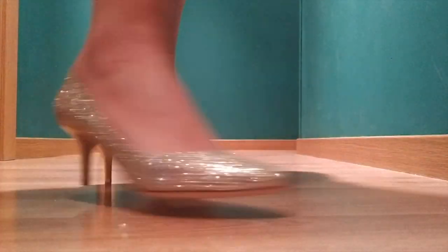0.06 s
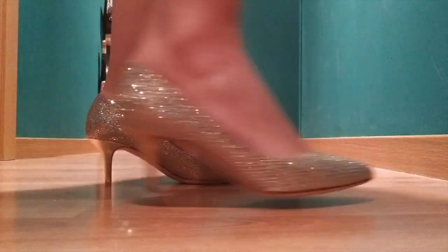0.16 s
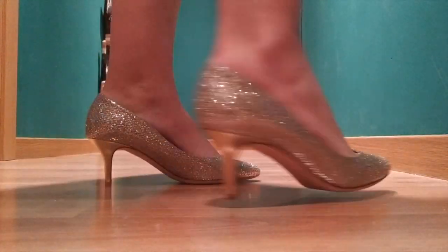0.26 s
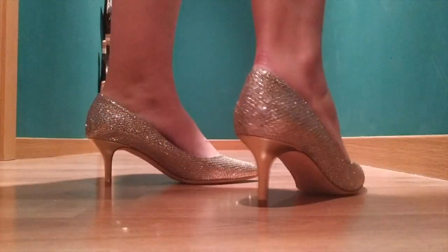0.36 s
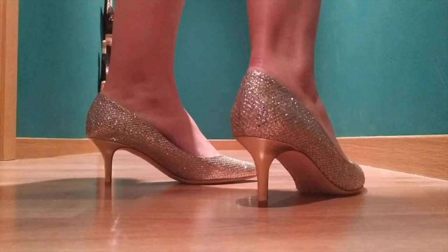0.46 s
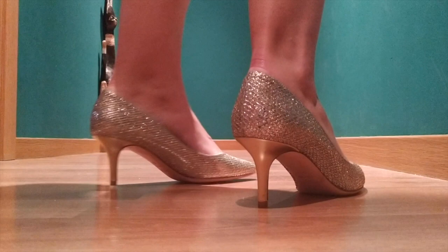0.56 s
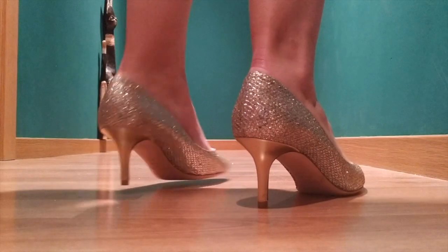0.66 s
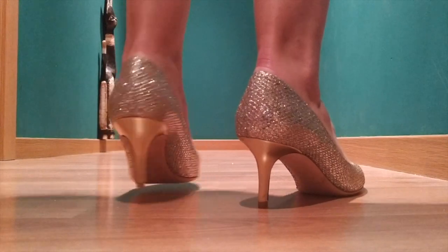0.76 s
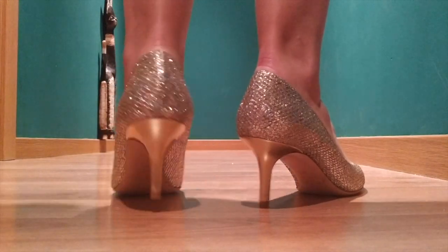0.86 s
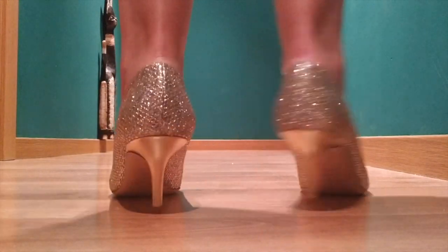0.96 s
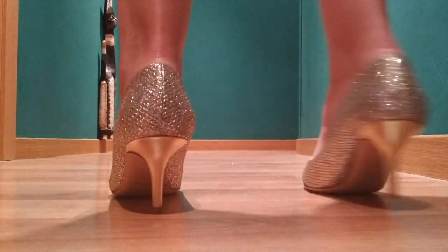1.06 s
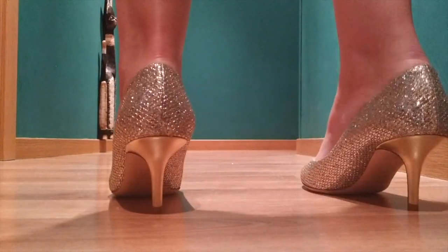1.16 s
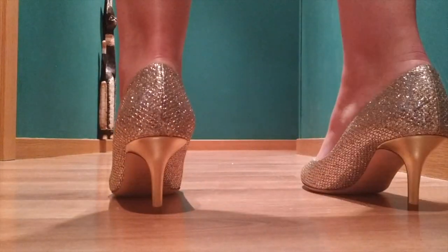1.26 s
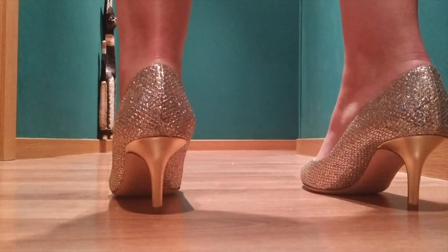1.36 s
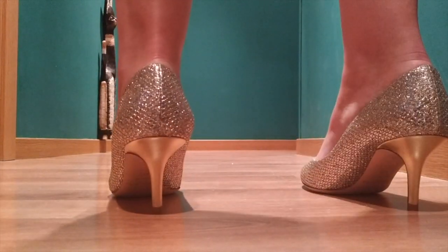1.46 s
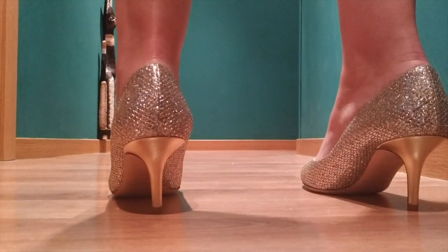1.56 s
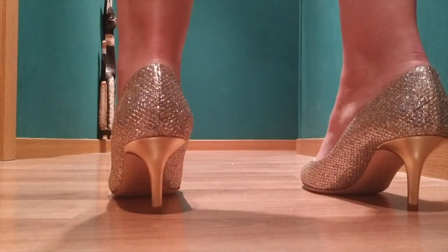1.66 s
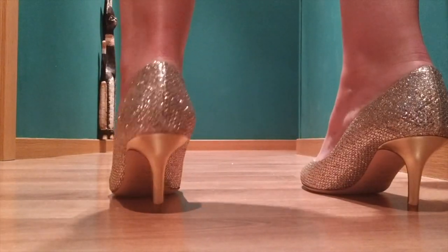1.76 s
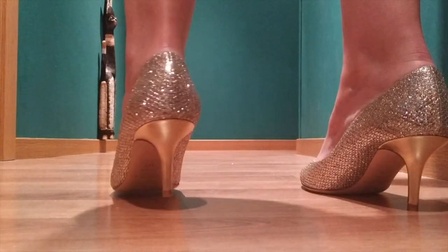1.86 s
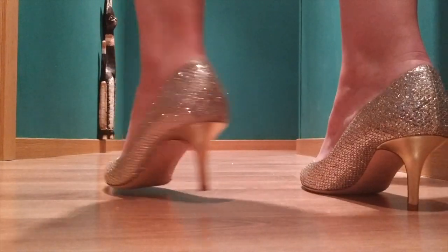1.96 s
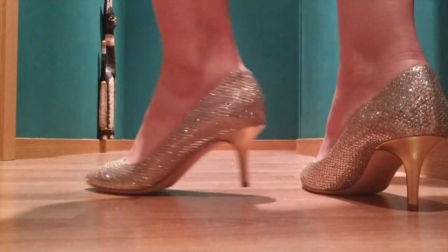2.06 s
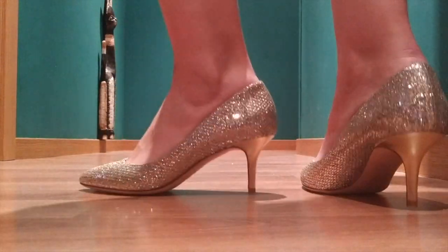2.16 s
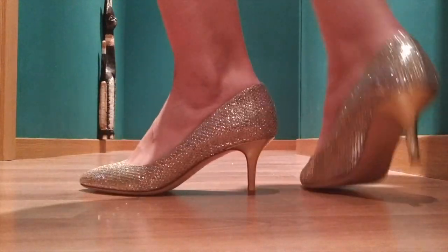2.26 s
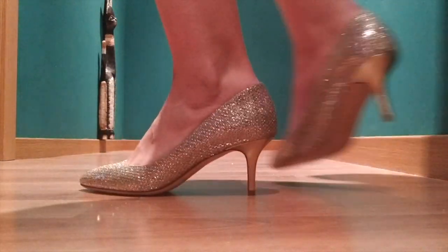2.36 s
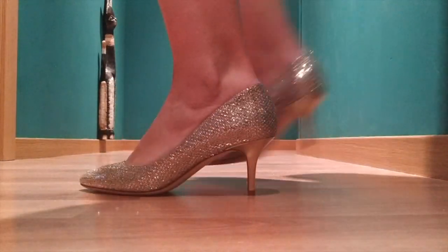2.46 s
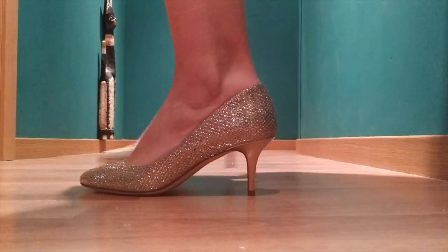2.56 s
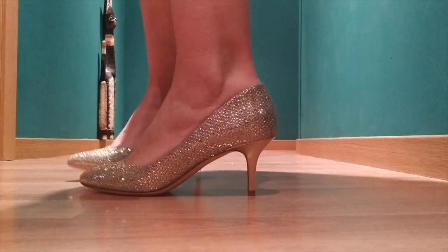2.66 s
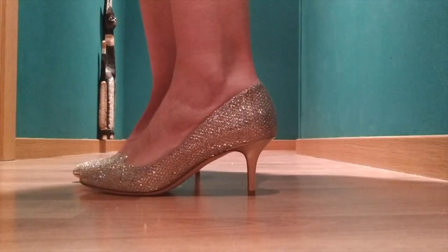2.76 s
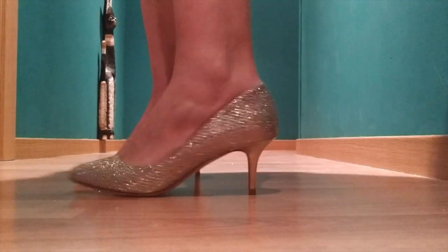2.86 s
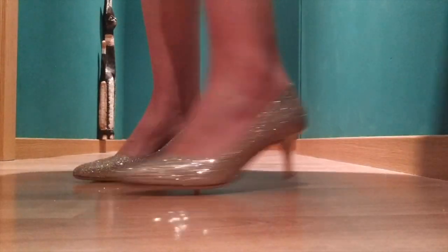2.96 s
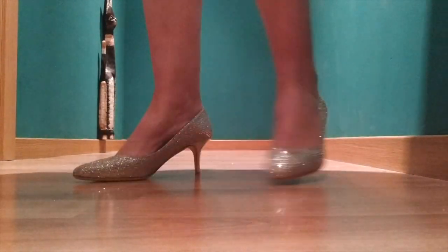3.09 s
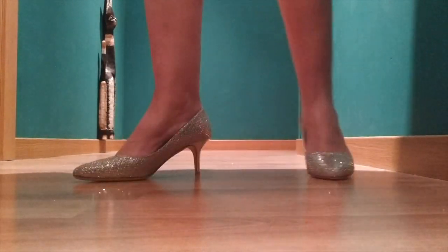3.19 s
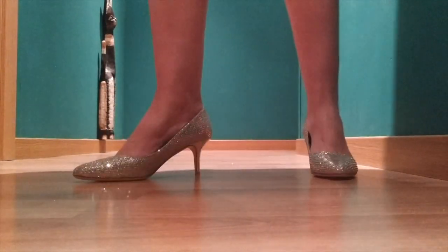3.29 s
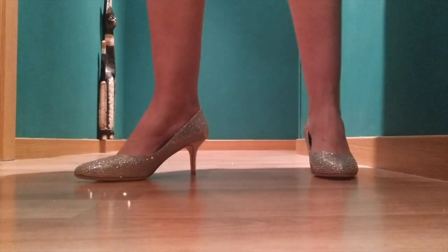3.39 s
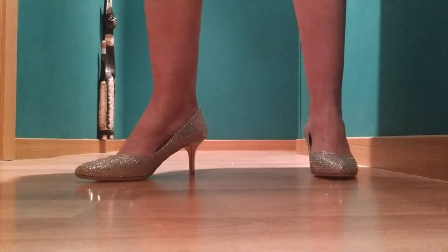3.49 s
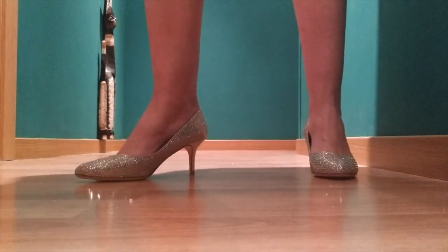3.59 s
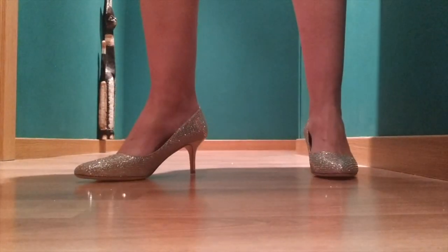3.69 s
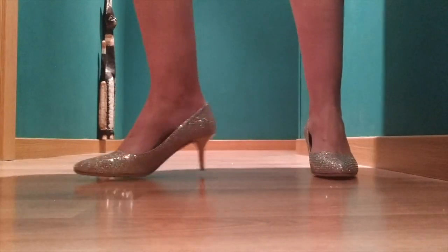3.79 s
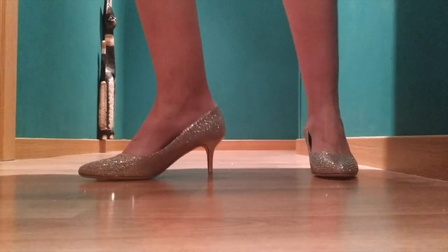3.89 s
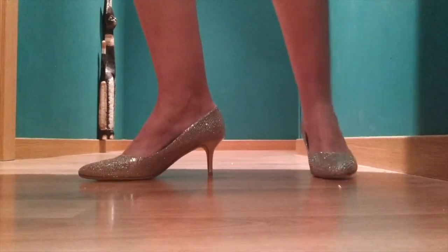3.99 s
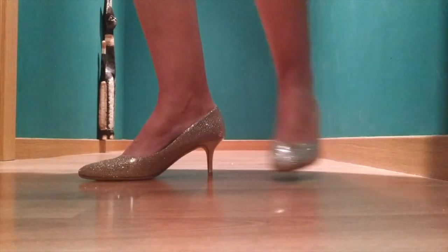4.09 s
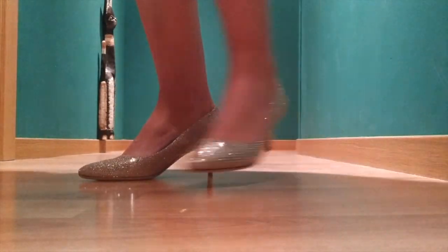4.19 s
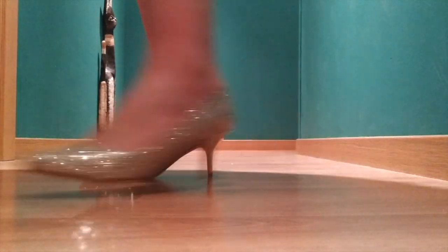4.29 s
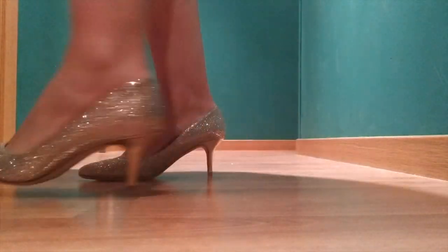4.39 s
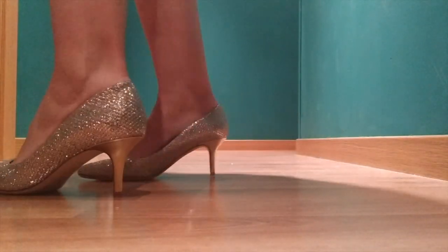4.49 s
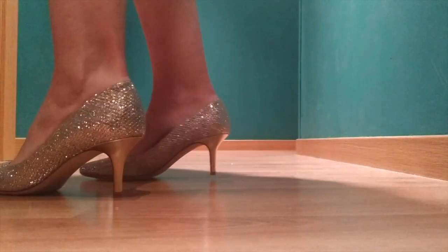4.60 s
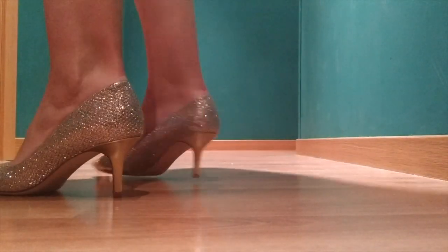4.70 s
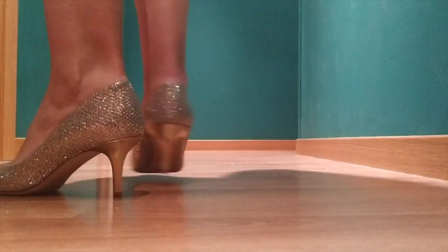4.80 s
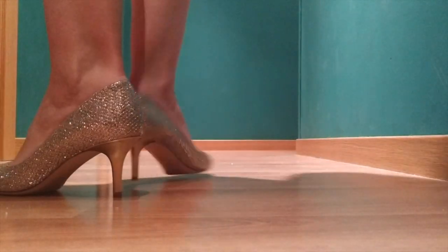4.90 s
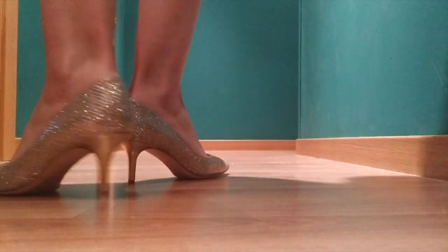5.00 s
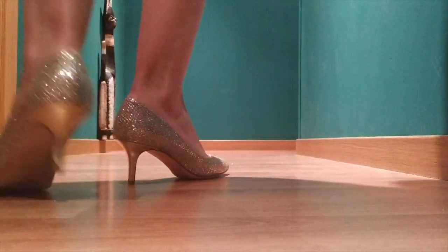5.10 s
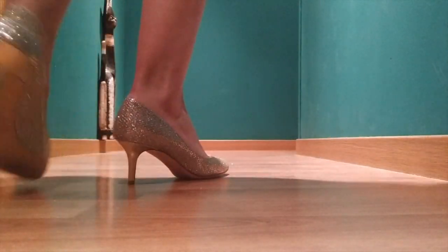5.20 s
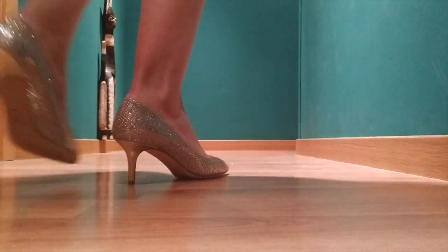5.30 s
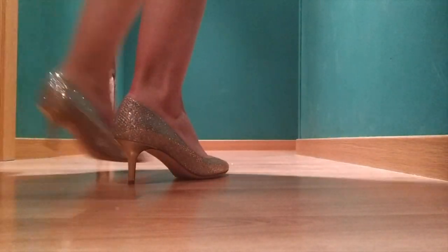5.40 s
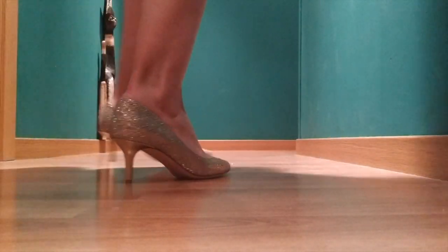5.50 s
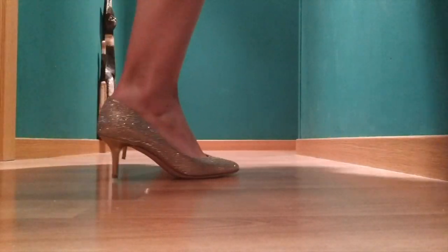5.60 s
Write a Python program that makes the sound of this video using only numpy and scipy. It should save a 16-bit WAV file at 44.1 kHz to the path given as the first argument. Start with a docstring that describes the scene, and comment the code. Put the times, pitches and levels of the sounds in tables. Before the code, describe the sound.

A small, bare, slightly boomy room with a laminate floor, heard from close stereo microphones low down. Faint hiss and a weak, swelling deep rumble lie underneath. A soft sole slide leads to a double heel knock at 0.36 s with a sharp snap. Knocks follow at 0.86 and 0.95 with a bright gritty scuff, then the loudest hollow thud at 1.16. It calms until a light step at 2.08 and a fainter one at 2.19. A quick uneven cluster of taps runs from 2.6 to 2.9, then softer knocks at 3.15 and 3.3 with scuffing and small snaps. Clickier taps come at 3.84 and 3.91. After a lull, a low, heavy double knock lands at 4.47, a crisp snap at 4.61, a lighter step at 4.94 with a hissing slide, and a last dull, ticking knock at 5.58, with a small snap after. Each knock rings for under half a second.

```python
"""In a small bare room, someone in stiletto heels steps to and fro on a laminate floor near the microphones.
Each knock is a damped thud of the board, a noise burst from the hard heel tip, two wall reflections
and a ring of reverberant noise and decaying floor modes. Between steps the sliding soles hiss as grainy,
filtered noise, and the shoes snap in short bursts of slips. A faint hiss and a deep rumble lie beneath."""
import sys
import numpy as np
from scipy import signal
from scipy.fft import rfft, irfft, next_fast_len
from scipy.io import wavfile
from scipy.ndimage import uniform_filter1d

SR = 44100
rng = np.random.default_rng(int(sys.argv[2]) if len(sys.argv) > 2 else 0)


def transcribe(u):
    """Save the signal u as a 16-bit wav file named by the first command-line argument.

    u: samples, shape (n,) or (channels, n), limited to [-1, 1]; the rate is SR.
    q: integer samples, one column per channel.
    """
    v = np.clip(np.atleast_2d(u).T, -1, 1)
    q = np.round(v * 32767).astype(np.int16)
    wavfile.write(sys.argv[1], SR, q)


N = 249165
TIME = np.arange(N) / SR
FIRST_ECHO_S = .011  # delay of the reflection from the nearest wall


def from_db(db):
    """Level to amplitude: 20 dB is a factor of ten."""
    return 10 ** (np.asarray(db) / 20)


def unit_rms(x, size=None):
    """Normalisation of power: rms 1 over the first `size` samples."""
    return x / np.sqrt(np.mean(x[..., :size] ** 2) + 1e-20)


def at_hz(points, hz):
    """Logarithmic pitch scale: interpolate a table over log frequency."""
    table = np.array(points)
    return np.interp(np.log(np.maximum(hz, 1)), np.log(table[:, 0]), table[:, 1])


def colour(x, spectrum):
    """Minimum-phase filtering: the folded cepstrum gives a causal response of the given magnitude."""
    size = 2 * next_fast_len(x.shape[-1] // 2 + 1024)
    level_db = at_hz(spectrum, np.arange(size // 2 + 1) * SR / size)
    cepstrum = irfft(np.log(from_db(level_db)))
    # fold the negative times onto the positive ones
    cepstrum[1:size // 2] *= 2
    cepstrum[size // 2 + 1:] = 0
    response = np.exp(rfft(cepstrum))
    return irfft(rfft(x, size) * response)[..., :x.shape[-1]]


# correlation of left and right in a diffuse field: f/Hz, correlation [1]
CORRELATION = [(60, 0.69), (250, 0.86), (500, 0.79), (900, 0.14), (1500, 0.019), (15000, 0.027)]


def diffuse(size):
    """Diffuse-field coherence: noise from all sides, alike in the bass and nearly unrelated in the treble."""
    mid, side = rfft(rng.standard_normal((2, size)))
    alike = np.clip(at_hz(CORRELATION, np.arange(len(mid)) * SR / size), -1, 1)
    return irfft(np.sqrt(1 + alike) * mid + np.sqrt(1 - alike) * side * [[1], [-1]], size)


def from_the_right(x, pan_db):
    """Time and level difference: direct sound reaches the left later, and pan_db stronger than the right."""
    left_lag_s = 0.000403
    t = TIME[:len(x)]
    left = np.interp(t - left_lag_s, t, x, left=0)
    return np.array([left, x]) * from_db([[pan_db / 2], [-pan_db / 2]])


def add(out, s, sound):
    """Superposition: sound pressures add from time s on."""
    part = out[:, round(s * SR):][:, :sound.shape[1]]
    part += sound[:, :part.shape[1]]


# reverberation time of the room: f/Hz, T60/s
ROOM_DECAY = [(80, 0.16), (210, 0.6), (560, .42), (1470, 0.4), (3880, 0.37), (8400, 0.46), (14000, 0.43)]


def room_tail(first_echo_s, early_db, early_s, size=26000):
    """Reverberation: dense reflections with resonant lows, each octave decaying at its own rate."""
    t = TIME[:size]
    noise = rfft(diffuse(size))
    octave = np.log2(np.clip(np.arange(noise.shape[1]) * SR / size, 62.5, 16000))
    # resonances make the spectrum lumpy, less so in the treble
    lumps_db = np.interp(octave, np.linspace(octave[0], octave[-1], 130), rng.normal(0, 3, 130))
    lumps_db = lumps_db * np.interp(octave, np.log2([1000, 2500]), [1, .15])
    noise = noise * from_db(lumps_db)
    tail = 0
    for centre in np.arange(octave[0], octave[-1] + .5):
        band = irfft(noise * np.maximum(1 - abs(octave - centre), 0), size)
        tail = tail + band * from_db(-60 * t / at_hz(ROOM_DECAY, 2 ** centre))
    arrival = np.minimum(t / first_echo_s, 1) ** 4
    return tail * arrival * from_db(early_db * np.exp(-t / early_s))


def ring(hz, t60, size, phase=0):
    """Free vibration of a damped mode: a sine that loses 60 dB in t60."""
    t = TIME[:size]
    return np.sin(2 * np.pi * hz * t + phase) * from_db(-60 * t / t60)


def burst(envelope, spectrum, pan_db, scatter_db=2.0):
    """Impulsive noise: tiny uneven slips, partly reaching each microphone scattered by shoe and floor."""
    size = len(envelope)
    slips = rng.laplace(size=(3, size))
    # flatten the spectrum, so that only the given one colours the burst
    for _ in range(3):
        slips = irfft(np.exp(1j * np.angle(rfft(slips * envelope))), size)
    slips = colour(slips * np.sqrt(envelope), spectrum)
    direct = from_the_right(slips[0], pan_db)
    scattered = from_db(scatter_db) * slips[1:]
    return unit_rms(direct + scattered, size=310)


# deep rumble: t/s, level/dB before the trim rumble_db
RUMBLE_LEVEL = [(0.0, -63.5), (0.68, -67), (0.88, -55), (2.72, -72), (4.06, -67.5), (4.88, -74),
                (5.05, -58.5), (5.32, -73.5), (5.65, -66)]
# spectrum of the still room's hiss: f/Hz, relative level/dB
QUIET_SPECTRUM = [(15, -5.5), (50, -8), (100, -20), (200, -20), (500, -29.5), (1300, -33.5), (3000, -33.5),
                  (6500, -36.5), (8400, -33), (10500, -35), (15000, -45.5)]


def quiet_room(quiet_db=-59, rumble_db=7.5):
    """Stationary and modulated noise: a faint steady hiss, and a deep rumble that comes and goes."""
    swell = from_db(np.interp(TIME, *np.transpose(RUMBLE_LEVEL)) + rumble_db)
    rumble_spectrum = [(10, -15.5), (18, 2.5), (32, -12), (55, -21.5), (150, -27.5), (600, -96)]
    rumble = unit_rms(colour(diffuse(N), rumble_spectrum))
    hiss = unit_rms(colour(diffuse(N), QUIET_SPECTRUM))
    return swell * rumble + from_db(quiet_db) * hiss


def stroke(start_s, attack_s, hold_s, fade_db_per_s=123.5):
    """Envelope of sliding friction: the sole gathers speed, glides, stops, and the sound decays exponentially."""
    t = TIME - start_s
    fade_s = np.maximum(t - attack_s - hold_s, 0)
    return np.clip(t / attack_s, 0, 1) * from_db(-fade_db_per_s * fade_s)


# slides of a sole: start t/s, time to full speed t/s, time at full speed t/s,
#                   hiss level/dB, coarse grit relative to the hiss level/dB before the trim grit_db
SLIDES_OF_SOLES = [(.03, 0.028, 0.14, -60, 4), (0.499, 0.019, 0.045, -48.5, -0.5),
                   (0.649, 0.015, 0.04, -56, -5), (0.851, .016, 0.11, -41, 2), (1.05, 0.01, .025, -51, 4),
                   (1.69, 0.047, 0.14, -58, -8), (2.073, 0.0056, .01, -47.5, -14),
                   (2.221, 0.02, 0.012, -45.5, -5), (2.76, 0.086, 0.013, -47.5, -2),
                   (3.145, 0.0072, 0.013, -42, 3.5), (3.345, 0.015, 0.012, -48.5, 2),
                   (3.67, 0.046, 0.0089, -55, -2.5), (3.83, 0.011, 0.15, -55.5, 0.5),
                   (4.45, 0.016, 0.19, -49.5, -2), (4.935, 0.02, 0.091, -43.5, -3),
                   (5.465, 0.043, 0.17, -48, -3.5)]
# spectrum of the fine friction hiss: f/Hz, relative level/dB
HISS_SPECTRUM = [(3000, -13.5), (5500, -10.5), (7200, -5.5), (8400, 5.5), (9500, -3), (11000, -11.5),
                 (13500, -13.5), (15000, -51)]
# spectrum of the coarse grit: f/Hz, relative level/dB
GRIT_SPECTRUM = [(400, 5), (900, 13.5), (1600, -9.5), (2800, 4.5), (4000, 6.5), (5500, 5.5), (7500, 1.5),
                 (11000, -30)]


def soles(creep_db=-67.5, grit_db=-8.0, direct_db=1):
    """Sliding friction: soles catch on countless specks, a grainy hiss with coarser grit under more weight."""
    # soles under load never quite rest: a faint creep underlies all slides
    hiss_power = grit_power = from_db(creep_db) ** 2
    for start_s, attack_s, hold_s, level_db, coarse_db in SLIDES_OF_SOLES:
        power = (from_db(level_db) * stroke(start_s, attack_s, hold_s)) ** 2
        hiss_power = hiss_power + power
        grit_power = grit_power + power * from_db(coarse_db) ** 2
    flutter = unit_rms(uniform_filter1d(rng.standard_normal(N), size=130))
    grain = from_db(5 * np.minimum(flutter, 2))
    # the direct sound is grainy, the room's share smooth
    friction = from_db(direct_db) * unit_rms(diffuse(N) * grain) + unit_rms(diffuse(N))
    hiss = np.sqrt(hiss_power) * unit_rms(colour(friction, HISS_SPECTRUM))
    coarse = unit_rms(colour(diffuse(N) * np.sqrt(grain), GRIT_SPECTRUM))
    return hiss + from_db(grit_db) * np.sqrt(grit_power) * coarse


# shoe snaps, before the trims in snaps(): t/s, level/dB, lift below 6 kHz level/dB,
#                                          room relative to the snap level/dB
SHOE_SNAPS = [(0.0821, -39.5, -16, -15.5), (0.3743, -19, -2, -19.5), (.921, -37.5, -12, -21),
              (1.151, -49, -25, -34), (1.581, -55.5, -19, -19), (2.0762, -45, -24, -20),
              (2.137, -53.5, 13, -22), (2.227, -47, -17, -15), (2.717, -53, -10, -2),
              (3.205, -41.5, -8, -11), (3.2953, -37, -10, -18), (3.749, -51.5, -9, -19),
              (4.59, -48, 8, -28), (4.613, -19, -1.5, -11), (4.869, -56.5, -25, -9.5),
              (5.045, -39, -42, -27), (5.3163, -54, -19, -9), (5.639, -31, -10.5, -17)]
# spectrum of a snap before the lift: f/Hz, relative level/dB
SNAP_SPECTRUM = [(600, -25.5), (1500, -16), (2400, -13.5), (3400, -3.5), (4700, -2.5), (6500, -2.5),
                 (8400, 7.5), (9800, -4.5), (11000, -10), (15000, -24.5)]


def snaps(snap_db=1.5, lift_trim_db=4.5, room_db=-5.5, size=900):
    """Stick-slip: a sticking shoe lets go in tiny slips a few ms long, and a wall throws the burst back."""
    out, t = np.zeros((2, N)), TIME[:size]
    for s, level_db, lift_db, wet_db in SHOE_SNAPS:
        spectrum = [(hz, db + (lift_db + lift_trim_db) * (hz < 6000)) for hz, db in SNAP_SPECTRUM]
        snap = burst(t * np.exp(-t / .0017), spectrum, pan_db=1.5)
        tail = unit_rms(colour(room_tail(FIRST_ECHO_S, 10.5, 0.16), spectrum), size=2200)
        gain = from_db(level_db + snap_db)
        add(out, s - .0003, gain * snap)
        add(out, s, gain * from_db(wet_db + room_db) * tail)
        add(out, s + rng.uniform(.020, .024), gain * from_db(wet_db) * snap)
    return out


# ring of the whole floor, before small random shifts: f/Hz, relative level/dB, T60/s
MODES_OF_FLOOR = [(122.4, -5, 0.1), (165.5, -12, 0.28), (253, -21, 0.59), (347, -13.5, 0.31),
                  (403, -14, 0.41), (597, -2.5, 0.12), (812, -13, 0.16), (868, -1.5, 0.071)]
# spectrum of the reverberant boom, before the tilt: f/Hz, relative level/dB
BOOM_SPECTRUM = [(40, -48), (80, -2), (125, -2.5), (300, 1.5), (450, 3), (650, 4.5), (850, 0), (1050, -4.5),
                 (1500, -18), (2500, -66.5), (5000, -94.5)]


def boom(pitch_hz, spot_hz, spot_db, modes_db=-5, tilt_db=3.0, spot_t60=0.2, size=26000):
    """Modal excitation: each spot on the floor favours one mode, and a sharper knock the higher pitches."""
    tilt = tilt_db * np.log2(pitch_hz / 530)
    spectrum = [(hz, db + tilt * np.log2(min(hz, 1000) / 400)) for hz, db in BOOM_SPECTRUM]
    air = unit_rms(colour(room_tail(FIRST_ECHO_S, 13.5, 0.012), spectrum), size=2200)
    build_up = np.minimum(TIME[:size] / FIRST_ECHO_S, 1) ** 2
    modes = 0
    for hz, db, t60 in MODES_OF_FLOOR:
        gain = from_db(db + rng.normal(0, 1.65))
        modes = modes + gain * ring(hz * rng.normal(1, 0.0067), t60, size, rng.uniform(0, 2 * np.pi))
    modes = from_db(modes_db) * unit_rms(modes * build_up, size=2200)
    spot = from_db(spot_db) * unit_rms(build_up * ring(spot_hz, spot_t60, size), size=2200)
    return unit_rms(air + spot + modes, size=2200)


# spectrum of the heel tip, before the peak at its own pitch: f/Hz, relative level/dB
TICK_SPECTRUM = [(700, -10.5), (1300, 5), (2200, 6), (3000, 1), (4200, 1), (5500, -3), (7000, -4),
                 (8400, 6), (10500, -13), (15000, -32.5)]


def tick(pitch_hz, peak_db=7.0, width_octaves=0.13, room_db=-13, size=900):
    """Hard contact with resonance: the heel tip crunches briefly on the varnish, and the heel rings with it."""
    hz = np.geomspace(700, 15000, 50)
    peak = peak_db * np.exp(-(np.log2(hz / pitch_hz) / width_octaves) ** 2)
    spectrum = np.c_[hz, at_hz(TICK_SPECTRUM, hz) + peak]
    tail = colour(room_tail(FIRST_ECHO_S, 40.0, 0.0059), spectrum)
    out = from_db(room_db) * unit_rms(tail, size=2200)
    out[:, :size] += burst(np.exp(-TIME[:size] / .005), spectrum, pan_db=-2)
    return out


# modes of the board under the heel: multiple of the thud pitch [1], relative level/dB, T60/s
BOARD_MODES = [(.42, -15.5, 0.033), (1.0, 22, 0.0044), (1.6, -16, 0.018)]


def thud(pitch_hz, return_s=0.004664, return_db=-9.0, softness=1.93, low_cut_hz=105, size=2000):
    """Damped bending: the heel pushes the board down, it swings back, and the wave returns from its edge."""
    t = TIME[:size]
    swing = -sum(from_db(db) * ring(ratio * pitch_hz, t60, size) for ratio, db, t60 in BOARD_MODES)
    # the soft contact removes the treble
    contact = signal.butter(4, min(softness * pitch_hz, 1400), fs=SR, output="sos")
    swing = signal.sosfilt(contact, swing)
    swing = swing + from_db(return_db) * np.interp(t - return_s, t, swing, left=0)
    # a small board radiates little bass
    radiation = signal.butter(2, low_cut_hz, "high", fs=SR, output="sos")
    return unit_rms(signal.sosfilt(radiation, swing), size=310)


# heel and sole knocks, before the trims in steps(): t/s, thud level/dB, thud f/Hz, tick level/dB, tick f/Hz,
#   ring of floor and room relative to the thud level/dB, floor mode under the foot f/Hz,
#   that mode relative to the reverberant part of the ring level/dB
KNOCKS = [(.358, -25, 477, -55.5, 4220, -11.5, 389.4, 0.5), (0.3714, -29.5, 580, -44, 2180, -14, 610, -6),
          (0.856, -25, 790, -45, 2240, -14, 695, -4), (.955, -22, 630, -52.5, 2700, -17.5, 166.6, -4),
          (1.1634, -16.5, 690, -43, 1940, -15.5, 313.5, -6.5),
          (1.744, -55.5, 440, -64.5, 2400, -15, 154, 6), (2.076, -29.5, 534, -45.5, 4250, -12.5, 122, -10),
          (2.192, -36.5, 580, -63.5, 2400, -16.5, 157, -9.5), (2.598, -53.5, 1110, -63, 2200, -21, 1010, 6),
          (2.6979, -30, 720, -39.5, 2690, -4.5, 590, -12),
          (2.7519, -23, 740, -40.5, 2120, -8.5, 394, -14.5), (2.822, -44.5, 497, -47, 2020, 0.5, 256, -2),
          (2.8812, -30.5, 474, -53, 2330, -13, 340, -2), (3.1488, -35.5, 547, -66, 4260, -8, 396, -2),
          (3.3074, -27, 570, -44.5, 2470, -9.5, 612, -17), (3.67, -56, 960, -68, 2440, -8.5, 642, -9),
          (3.835, -29.5, 630, -33, 3980, -5, 124, -3.5), (3.9118, -34.5, 627, -57, 2420, -5.5, 624, -8),
          (4.462, -24.5, 424, -51, 4260, -13.5, 276, -9),
          (4.4757, -19.5, 395, -44.5, 4000, -16.5, 148.6, -5.5),
          (4.9369, -30, 504, -47, 2500, -6, 615.4, -3.5), (5.5781, -26, 365, -35, 3570, -7, 129, -7)]


def steps(boom_db=1.5, tick_db=3.0, lead_s=.0004, wall_db=-4.5):
    """Impact, reflection and reverberation: thud, tick, slaps from the two nearest walls, and the ring."""
    out = np.zeros((2, N))
    for s, level_db, pitch_hz, hard_db, tick_hz, ring_db, spot_hz, spot_db in KNOCKS:
        knock = thud(pitch_hz)
        add(out, s - lead_s, from_db(level_db) * from_the_right(knock, pan_db=-3.0))
        for wall_s in (FIRST_ECHO_S, rng.uniform(.02, .03)):
            spreading = FIRST_ECHO_S / wall_s  # the longer path is the weaker one
            slap = spreading * from_db(level_db + ring_db + wall_db) * knock
            add(out, s + wall_s, np.array([slap, slap]))
        add(out, s, from_db(level_db + ring_db + boom_db) * boom(pitch_hz, spot_hz, spot_db))
        add(out, s - lead_s, from_db(hard_db + tick_db) * tick(tick_hz))
    return out


def scene():
    """Superposition of the quiet room, sliding soles, shoe snaps and steps."""
    return quiet_room() + soles() + snaps() + steps()


def record(dry, cutoff_hz=14600):
    """Frequency response and band limit: the left microphone is brighter at the very top; the top is cut."""
    left = colour(dry[0], [(1000, -0.5), (9000, -1.5), (12000, 6.0), (15000, 8.0)])
    right = colour(dry[1], [(1000, 0.0), (9000, -1.0), (12000, 1.5), (15000, 5.5)])
    low_pass = signal.ellip(10, .2, 80, cutoff_hz, fs=SR, output="sos")
    return signal.sosfilt(low_pass, [left, right])


dry = scene()
out = record(dry)
transcribe(out)
```